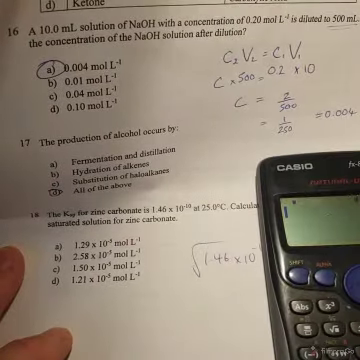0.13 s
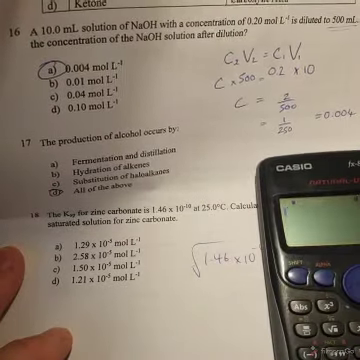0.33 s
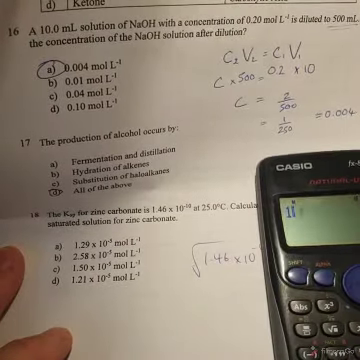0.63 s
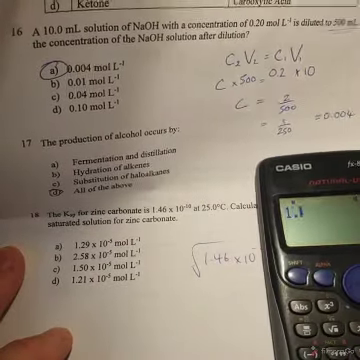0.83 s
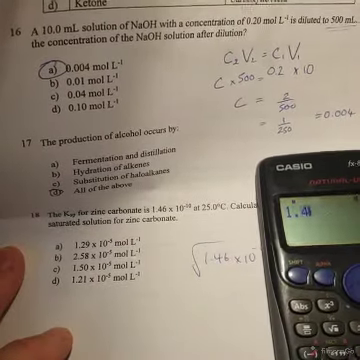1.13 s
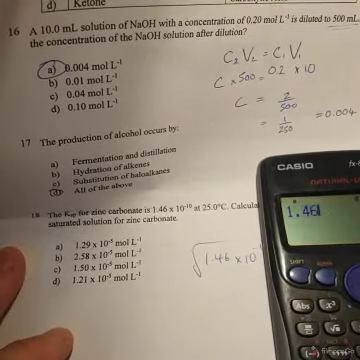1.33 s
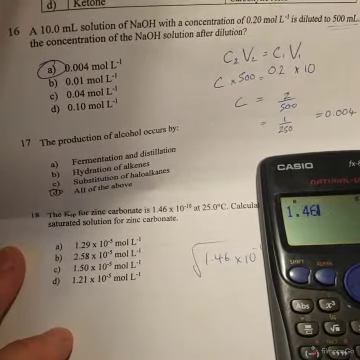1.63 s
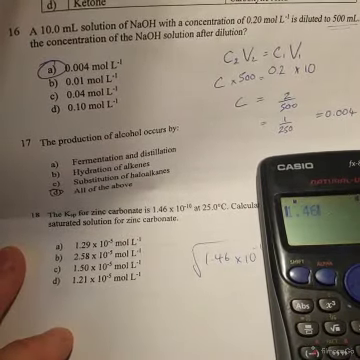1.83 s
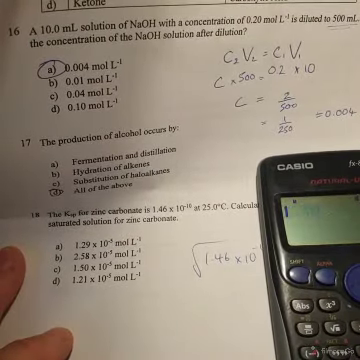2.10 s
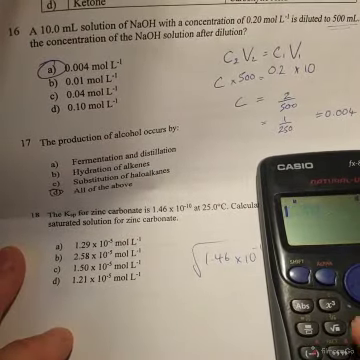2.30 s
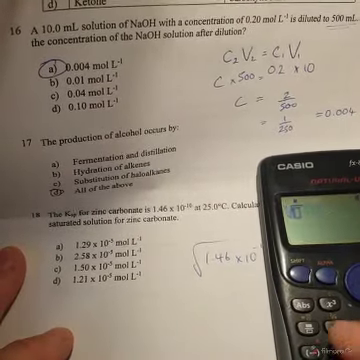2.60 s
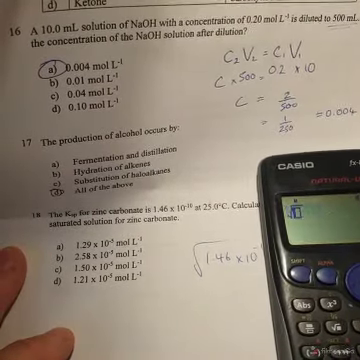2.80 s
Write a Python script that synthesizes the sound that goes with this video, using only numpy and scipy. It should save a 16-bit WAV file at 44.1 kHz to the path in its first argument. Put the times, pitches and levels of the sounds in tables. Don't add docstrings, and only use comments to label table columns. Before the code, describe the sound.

Calculator keys pressed with short plastic clacks on a wooden desk in a small quiet room

```python
import sys
import numpy as np
from scipy import signal
from scipy.fft import rfft, irfft
from scipy.io import wavfile

SR = 44100
rng = np.random.default_rng(int(sys.argv[2]) if len(sys.argv) > 2 else 0)


def to_linear_factor(level_db):
    exponent = np.asarray(level_db, float) / 20
    return 10 ** exponent


def log_audio(samples):
    frames = np.atleast_2d(samples).T
    limited = np.clip(frames, -1, 1)
    pcm = np.round(limited * 32767).astype(np.int16)
    wavfile.write(sys.argv[1], SR, pcm)


N = 130095


def rms_one(x):
    return x / np.sqrt(np.mean(x ** 2) + 1e-20)


def in_time(rows):
    s, db = np.transpose(rows)
    return to_linear_factor(np.interp(np.arange(N) / SR, s, db, left=-140, right=-140))


def at_hz(points, hz):
    table_hz, value = np.transpose(points)
    return np.interp(np.log(np.maximum(hz, 1)), np.log(table_hz), value)


def bandpass(x, low_hz, high_hz):
    return signal.sosfilt(signal.butter(2, [low_hz, high_hz], "band", fs=SR, output="sos"), x)


def alike_pair(mid, side, alike):
    return np.sqrt(1 + alike) * mid + np.sqrt(1 - alike) * side * [[1], [-1]]


def coloured(spectrum, likeness):
    hz = np.fft.rfftfreq(N, 1 / SR)
    mid, side = rfft(rng.standard_normal((2, N)))
    alike = np.clip(at_hz(likeness, hz), 0, 1)
    gain = (hz > spectrum[0][0] * .7) * to_linear_factor(at_hz(spectrum, hz))
    return rms_one(irfft(gain * alike_pair(mid, side, alike), N))


def through(bands, noise):
    out = 0
    for hz, width_hz, db in bands:
        r = np.exp(-np.pi * width_hz / SR)
        b = [1 - r * r, 0, r * r - 1]
        a = [1, -2 * r * np.cos(2 * np.pi * hz / SR), r * r]
        twice = signal.lfilter(b, a, signal.lfilter(b, a, noise))
        out = out + to_linear_factor(db) * rms_one(twice)
    return rms_one(out)


def ring(clicks, hz, t60_s):
    r = to_linear_factor(-60 / (max(t60_s, .002) * SR))
    w = 2 * np.pi * hz / SR
    return signal.lfilter([.5, 0, -.5], [1, -2 * r * np.cos(w), r * r], clicks + 1e-18)


def rung(rows):
    out, size = np.zeros(N), SR // 3
    for s, db, hz, t60_s in rows:
        start = int(s * SR)
        click = np.zeros(size)
        click[0] = -to_linear_factor(db)
        out[start:][:size] += ring(click, hz, t60_s)[:N - start]
    return out


def soft(x, hz):
    r = np.exp(-2 * np.pi * hz / SR)
    return signal.lfilter([(1 - r) ** 2], [1, -2 * r, r * r], x)


def swell(s, db, rise_s, t60_s):
    fall, rise = to_linear_factor(-60 / (t60_s * SR)), np.exp(-1 / (rise_s * SR))
    clicks = np.zeros(N)
    clicks[(s * SR).astype(int)] = to_linear_factor(db)
    return signal.lfilter([1 - rise], [1, -rise], signal.lfilter([1], [1, -fall], clicks))


def shaken(shake, modes, t60_s):
    force = shake * rng.standard_normal(N) / np.sqrt(t60_s * SR / 14)
    return sum((-1) ** k * to_linear_factor(db) * ring(force, hz, decay_s) for k, (hz, db, decay_s) in enumerate(modes))


CHATTER_S, CHATTER_LOSS_DB = .0012, .3


def strike(s, db, modes, spread_db, count):
    luck = rng.standard_normal((len(s), len(modes) + 1, count))
    contact = np.arange(count)
    when_s = s[:, None] + CHATTER_S * contact * (1 + 0.28 * np.tanh(luck[:, -1]))
    out = np.zeros(N)
    for k, (hz, mode_db, t60_s) in enumerate(modes):
        hit_db = db[:, None] + mode_db - CHATTER_LOSS_DB * contact + spread_db * luck[:, k]
        clicks = np.zeros(N)
        np.add.at(clicks, (when_s * SR).astype(int), -to_linear_factor(hit_db))
        out += ring(clicks, hz, t60_s)
    return out


# frequency in Hz, level in dB per Hz.
HUM = [(20, -6), (40, 6), (80, 1.5), (125, -0.5), (170, -9), (250, -21), (420, -37.5)]
HISS = [(300, -7), (500, -8.5), (900, -12.5), (6500, -22), (9000, -29.5), (12500, -17.5), (15000, -21),
        (16500, -29.5)]
# frequency in Hz, left-right likeness 0..1.
QUIET_LIKENESS = [(60, 0.75), (250, 0.84), (700, 0.25), (2000, 0.24)]
HUM_DB, HISS_DB = -69.5, -78


def noise_floor():
    return to_linear_factor(HUM_DB) * coloured(HUM, QUIET_LIKENESS) + to_linear_factor(HISS_DB) * coloured(HISS, QUIET_LIKENESS)


# time in seconds, level in dB.
SLIDE = [(0, -92), (.02, -79.5), (.1, -82), (.135, -98), (.16, -87), (.2, -84), (.24, -91), (.27, -105)]
# frequency in Hz, width in Hz, level in dB.
SLIDE_BANDS = [(800, 350, -2.5), (6650, 700, 0), (11100, 1100, -1.5), (11500, 4000, -4)]


def paper_slide():
    return to_linear_factor(13) * in_time(SLIDE) * through(SLIDE_BANDS, rng.standard_normal((2, N)))


# time in seconds, level in dB.
PEN_DRAG = [(.262, -83), (.29, -68.5), (.32, -64.5), (.36, -55), (.38, -90)]
# frequency in Hz, width in Hz, level in dB.
PEN = [(1900, 1300, -6), (1950, 110, -4), (3210, 140, 1), (4520, 130, -1.5), (6020, 130, -7)]


def pen_drag():
    return in_time(PEN_DRAG) * through(PEN, rng.standard_normal(N))


# time in seconds, level in dB.
SHIFT = [(.2, -101), (.33, -64), (.4, -73), (1.45, -86), (1.55, -72), (1.65, -81.5), (1.92, -71.5),
         (2.03, -62), (2.13, -53.5), (2.22, -57.5), (2.3, -71.5), (2.45, -75)]
# frequency in Hz, level in dB per Hz.
SHIFT_TONE = [(24, -40.5), (40, -6.5), (128, -1.5), (190, -14.5), (296, -13), (329, -22), (700, -44.5),
              (910, -72), (1540, -120)]
RUSTLE_DB = -28.5


def hand_shift():
    level = in_time(SHIFT)
    rustle = to_linear_factor(RUSTLE_DB) * through([(4000, 15000, 0)], rng.standard_normal((2, N)))
    return level * coloured(SHIFT_TONE, QUIET_LIKENESS) + np.sqrt(level * to_linear_factor(-59.5)) * rustle


# frequency in Hz, t60 in seconds.
ROOM_T60 = [(100, 0.78), (300, 0.22), (1000, 0.29), (3000, 0.28), (8000, 0.28), (12000, 0.29),
            (16000, 0.13)]
# frequency in Hz, level in dB.
ROOM_COLOUR = [(70, -19), (130, -4), (250, 2), (450, 0.5), (1000, 1.5), (3000, 6.5), (8000, 6), (15000, 1)]
# frequency in Hz, left-right likeness 0..1.
ROOM_ALIKE = [(100, 0.95), (300, 0.49), (700, 0.61), (1500, 0.0049)]
ROOM_START_S, ROOM_LEFT_DB = 0.005, -0.7


def room(x):
    size = SR // 2
    edges_hz = 60 * 2 ** np.arange(0, 8.6, .5)
    t = np.arange(size) / SR
    white = rng.standard_normal((2, 2, size))
    tail = 0
    for k, (low_hz, high_hz) in enumerate(zip(edges_hz, edges_hz[1:])):
        hz = np.sqrt(low_hz * high_hz)
        t60_s = at_hz(ROOM_T60, hz)
        mid, side = bandpass(white[k % 2], low_hz, high_hz)
        alike = np.clip(at_hz(ROOM_ALIKE, hz), 0, 1)
        band = alike_pair(mid, side, alike) / np.sqrt(2)
        tail = tail + band * to_linear_factor(at_hz(ROOM_COLOUR, hz) - 60 * t / t60_s) / np.sqrt(t60_s * SR / 14)
    tail = tail * np.clip(t / ROOM_START_S - 1, 0, 1)
    balance = to_linear_factor(np.array([[ROOM_LEFT_DB], [-ROOM_LEFT_DB]]))
    return balance * signal.fftconvolve(x[None], tail, axes=1)[:, :N]


# frequency in Hz, level in dB.
LEFT_RIGHT = [(60, -3), (300, -3), (1000, -4), (3000, -7.5), (9500, -11), (12000, 2.5), (15000, 3.5)]
# frequency in Hz, lag in seconds.
LEFT_LAG_S = [(600, .00025), (1200, .00018), (2200, .00014), (3400, .00025)]


def placed(x):
    hz = np.fft.rfftfreq(N, 1 / SR)
    tilt, wave = to_linear_factor(at_hz(LEFT_RIGHT, hz) / 2), rfft(x)
    lag = np.exp(-2j * np.pi * hz * at_hz(LEFT_LAG_S, hz))
    return irfft([wave * tilt * lag, wave / tilt], N)


# frequency in Hz, level in dB, t60 in seconds.
DESK = [(88, -10, .1), (105, -8, .09), (131, -6, .24), (145, -10, .12), (168, -6, .08), (199, -6, .11),
        (228, -8, .07)]
# start in seconds, level in dB, pitch in Hz, t60 in seconds.
THUDS = [(0.48, -41, 53, 0.11), (.5, -45.5, 131, .2), (0.76, -40, 57.5, .12), (.64, -40, 135, .25),
         (.757, -44.5, 131, .25), (.904, -37, 46.3, 0.37), (1.3, -35, 69.44, .12),
         (1.164, -37.5, 64.8, 0.35), (1.285, -38.5, 141, 0.18), (1.7515, -36, 64, .11),
         (1.753, -40, 125, .22), (1.756, -42, 40, .14), (1.76, -48, 240, .1), (2.56, -39.5, 42, 0.17),
         (2.57, -31, 130, .3), (2.6, -29.5, 72, 0.17)]
# frequency in Hz, level in dB per Hz.
WOBBLE = [(30, -6.5), (45, -0.5), (90, 5), (140, -8.5), (250, -34.5)]
DESK_DB, DESK_SOFT_HZ, THUD_SOFT_HZ = 0.5, 400, 203
WOBBLE_DB, WOBBLE_T60_S = -16, 0.31


def desk(s, db, back_s, back_db):
    blows = strike(np.r_[s, back_s], np.r_[db, back_db] + DESK_DB, DESK, spread_db=5.5, count=1)
    noise = coloured(WOBBLE, [(100, 0.92), (200, 0.96)])[0]
    wobble = swell(s, db + WOBBLE_DB, 0.023, WOBBLE_T60_S) * noise
    return soft(blows, DESK_SOFT_HZ) + soft(rung(THUDS), THUD_SOFT_HZ) + wobble


# frequency in Hz, level in dB, t60 in seconds.
CASE = [(213, 0.5, 0.0027), (495, 3.5, 0.023), (270.5, -4, 0.09), (315, -7, 0.031), (365, -0.5, 0.047),
        (454, -3, 0.061), (490, -0.5, 0.029), (565, -8, 0.012), (615, -2, 0.035), (687, -6, .035),
        (880, -9, 0.062), (901, -5.5, 0.064), (1025, -9, .025), (1150, -11, .025)]
# frequency in Hz, level in dB, t60 in seconds.
SPRING = [(230, -8, 0.035), (320, -4.5, .04), (365, 1, 0.078), (430, -1, .025), (494, -8.5, .03),
          (630, -6, 0.034), (860, -8.5, .03)]
CASE_DB, BLOW_DB, RELEASE_SOFT_HZ = -0.5, -6, 800
ROCK_RISE_S, ROCK_T60_S = .002, .045


def case(s, db, back_s, back_db):
    shake = swell(s, db + CASE_DB, ROCK_RISE_S, ROCK_T60_S)
    blow = strike(s, db + BLOW_DB, CASE, spread_db=2.0, count=1)
    release = strike(back_s, back_db, SPRING, spread_db=1.0, count=1)
    return shaken(shake, CASE, ROCK_T60_S) + soft(blow + release, RELEASE_SOFT_HZ)


# start in seconds, level in dB, pitch in Hz, t60 in seconds.
ROCKS = [(.376, -24.5, 880, 0.019), (.379, -31.5, 365, 0.13), (.62, -29.5, 606, 0.073),
         (.622, -28.5, 368, 0.15), (.645, -27.5, 800, 0.04), (.9035, -20, 650, .025), (.911, -24, 400, .04),
         (.9235, -24, 1003, .015), (.9245, -17.5, 560, .03), (.9315, -22.5, 702, .03),
         (.942, -28, 416, .04), (.9712, -30, 1360, .025), (1.1622, -23, 3160, .012),
         (1.173, -21, 870, 0.022), (1.178, -24, 327, 0.051), (1.19, -26.5, 800, 0.032),
         (1.7448, -32.5, 1204, 0.027), (1.771, -49, 1180, .02), (1.8286, -56.5, 800, 0.021),
         (1.8288, -55, 1880, 0.044), (1.829, -48, 3500, 0.013), (1.8292, -50.5, 6200, .007),
         (2.553, -19.5, 900, 0.021), (2.5595, -22, 592, .04), (2.5615, -16, 358, 0.077),
         (2.608, -30, 400, 0.02)]
CHATTER_SOFT_HZ = 3500


def loose_parts():
    return soft(rung(ROCKS), CHATTER_SOFT_HZ * 2)


# start in seconds, level in dB, pitch in Hz.
TICKS = [(.367, -35, 5740), (.452, -43.5, 4200), (.495, -53, 4740), (.608, -50.5, 2190), (.705, -49, 4500),
         (.755, -55, 5060), (0.894, -39, 4500), (.912, -52, 5000), (0.97, -31.5, 3500), (.4315, -53, 7000),
         (.925, -40, 5000), (1.279, -61, 6000), (1.749, -46.5, 3500), (1.821, -65, 3020),
         (1.8289, -44, 1220), (1.147, -38.5, 1800), (1.151, -36, 4000), (1.227, -36.5, 3500),
         (1.739, -55.5, 2510), (1.829, -46.5, 6540), (2.540, -59.5, 2440), (2.547, -54, 2006)]
TICK_DB, TICK_T60_S, TICK_WIDTH_OCT = -2.5, .016, .9


def ticks():
    out, size = np.zeros(N), SR // 40
    t = np.arange(size) / SR
    spread = 2 ** TICK_WIDTH_OCT
    for s, db, hz in TICKS:
        puff = rms_one(bandpass(rng.standard_normal(size), hz / spread, min(hz * spread, 2e4)))
        envelope = to_linear_factor(db + TICK_DB - 60 * t / TICK_T60_S) * (1 - np.exp(-t / 0.00023))
        out[int(s * SR):][:size] += envelope * puff
    return out


# frequency in Hz, level in dB, t60 in seconds.
KNOCK = [(620, -2.5, 0.013), (778, -8, 0.057), (888, 3, 0.0087), (1093, -8.5, 0.0076), (1400, -14, 0.0021)]
KNOCK_DB = -5


def knock(s, db):
    return soft(strike(s, db + KNOCK_DB, KNOCK, spread_db=2.5, count=4), CHATTER_SOFT_HZ)


# frequency in Hz, level in dB, t60 in seconds.
CAP = [(1720, 0.5, 0.033), (2130, 2.5, 0.025), (2600, -6, 0.012), (3070, -3, 0.018), (3800, -10.5, 0.0033),
       (4530, -14, 0.018), (6010, -12, 0.014), (7080, -22, 0.011), (10200, -11, 0.021), (13000, -10, .004)]
# frequency in Hz, level in dB per Hz.
CRACK = [(880, -5), (1500, 0.5), (3200, -5.5), (5830, -14), (9280, -22.5), (11200, -14), (14500, -24.5),
         (16500, -30)]
CAP_DB, CRACK_DB, CRACK_T60_S = -5, 11, 0.0097


def crack(s, db):
    cap = strike(s, db + CAP_DB, CAP, spread_db=3.0, count=4)
    puff = swell(s, db + CRACK_DB, 0.0026, CRACK_T60_S) * coloured(CRACK, [(100, 1), (200, 0.99)])[0]
    return cap + puff


TRAVEL_S, TRAVEL_DB = .008, -21


def key_travel(s, db):
    return swell(s - TRAVEL_S, db + TRAVEL_DB, 0.0057, 0.013) * coloured(CRACK, [(100, 1), (200, 0.36)])[0]


ROOM_KNOCK_DB, ROOM_CRACK_DB = 15.5, 26


def blows_to_room(s, knock_db, crack_db):
    clicks = np.zeros((2, N))
    clicks[:, (s * SR).astype(int)] = to_linear_factor(np.array([knock_db + ROOM_KNOCK_DB, crack_db + ROOM_CRACK_DB]))
    hz = np.fft.rfftfreq(N, 1 / SR)
    bright = irfft(rfft(clicks[1]) * to_linear_factor(at_hz(CRACK, hz)), N)
    return bright + bandpass(clicks[0], 550, 1600)


# start in seconds, then knock, crack, case and desk levels in dB.
PRESSES = [
    (0.3753, -18.5, -29, -29, -30.5),
    (0.6178, -21, -26.5, -26, -32.5),
    (0.9022, -17.5, -23.5, -30, -31),
    (0.9233, -24.5, -39, -29.5, -31.5),
    (1.162, -13, -22.5, -23, -27.5),
    (1.7454, -44, -48.5, -45, -49.5),
    (2.5526, -20.5, -27, -31.5, -36.5),
    (2.5584, -15, -22, -23, -27),
]
# start in seconds, case level in dB, desk level in dB.
RELEASES = [(0.4898, -39, -48), (0.7493, -35.5, -44), (1.01, -35.5, -43), (1.273, -37.5, -52),
            (1.292, -52.5, -54.5), (2.652, -37.5, -55)]
NEAR_TO_ROOM, TICK_TO_ROOM = .15, .15


def keys():
    s, knock_db, crack_db, case_db, desk_db = np.transpose(PRESSES)
    back_s, back_case_db, back_desk_db = np.transpose(RELEASES)
    near = knock(s, knock_db) + crack(s, crack_db) + key_travel(s, knock_db) + loose_parts()
    body = case(s, case_db, back_s, back_case_db) + desk(s, desk_db, back_s, back_desk_db)
    thin = ticks()
    feed = NEAR_TO_ROOM * near + TICK_TO_ROOM * thin + body + blows_to_room(s, knock_db, crack_db)
    return near + body + thin, feed


def scene():
    quiet = noise_floor() + paper_slide() + hand_shift()
    pen = pen_drag()
    direct, feed = keys()
    return quiet + room(feed + pen) + placed(direct + pen)


def top_cut(x):
    return signal.sosfilt(signal.butter(12, 16990, fs=SR, output="sos"), x)


MIC_LOW_HZ, CUTOFF_HZ = 30, 17050
MIC_DIP_HZ, MIC_DIP_WIDTH_HZ, MIC_DIP_SHARE = 8900, 1900, .5


def record(dry):
    x = signal.sosfilt(signal.butter(2, MIC_LOW_HZ, "high", fs=SR, output="sos"), dry)
    b, a = signal.iirpeak(MIC_DIP_HZ, MIC_DIP_HZ / MIC_DIP_WIDTH_HZ, SR)
    x = x - MIC_DIP_SHARE * signal.lfilter(b, a, x)
    x = signal.sosfilt(signal.cheby2(12, 60, CUTOFF_HZ, fs=SR, output="sos"), x)
    return top_cut(x)


dry = scene()
out = record(dry)
log_audio(out)
```